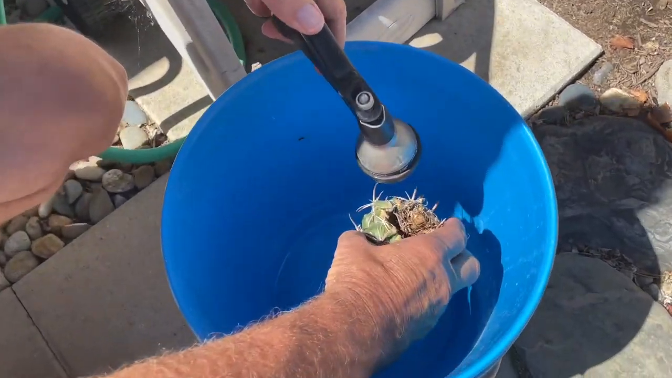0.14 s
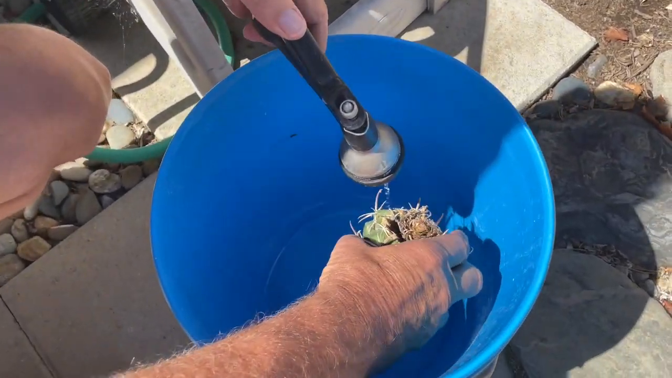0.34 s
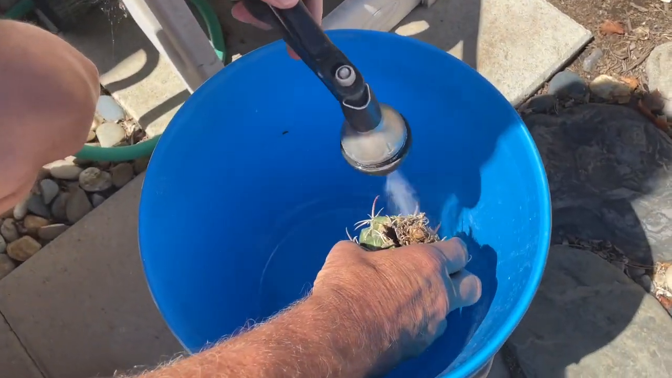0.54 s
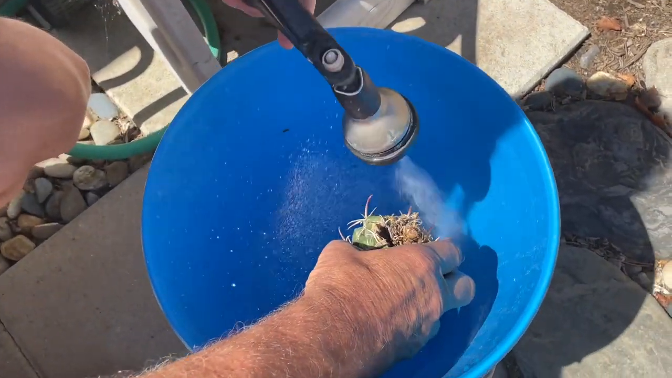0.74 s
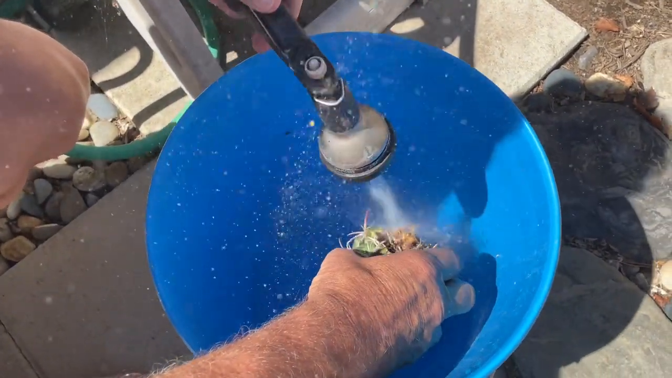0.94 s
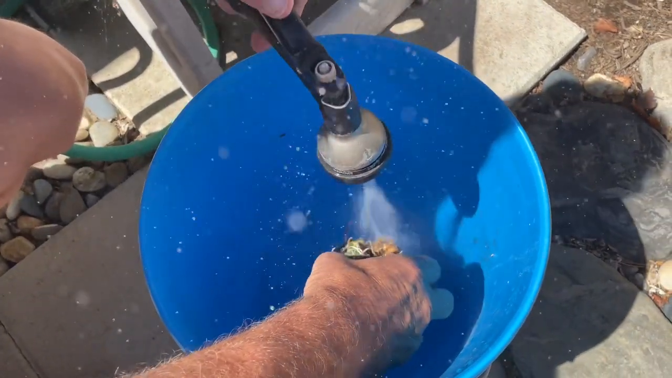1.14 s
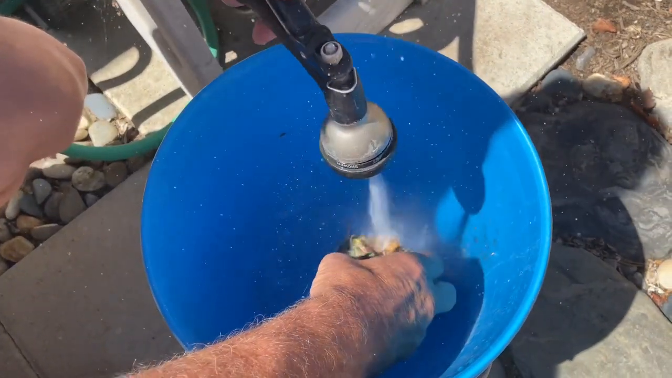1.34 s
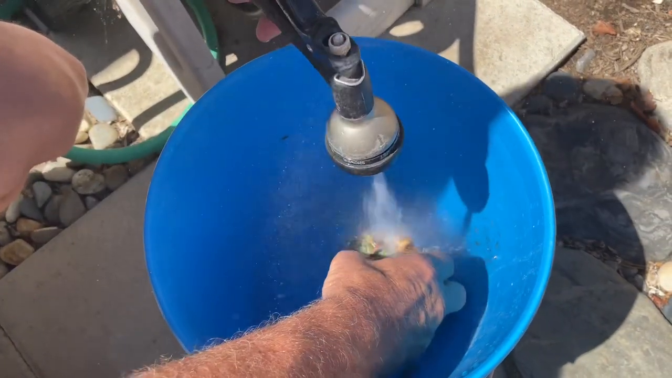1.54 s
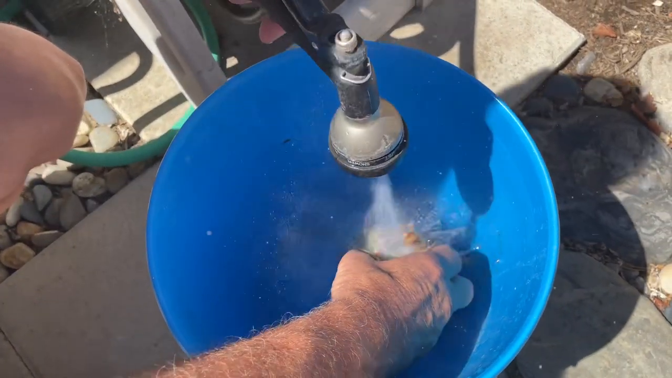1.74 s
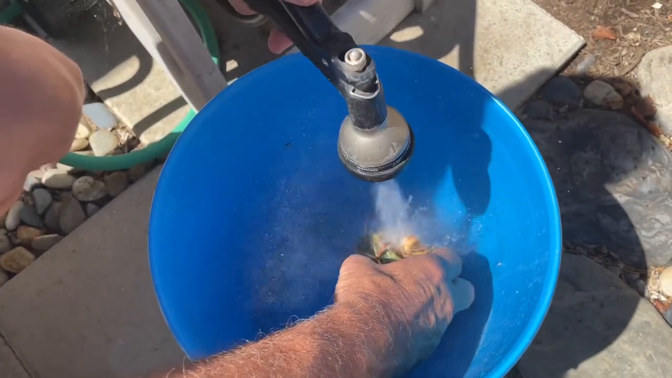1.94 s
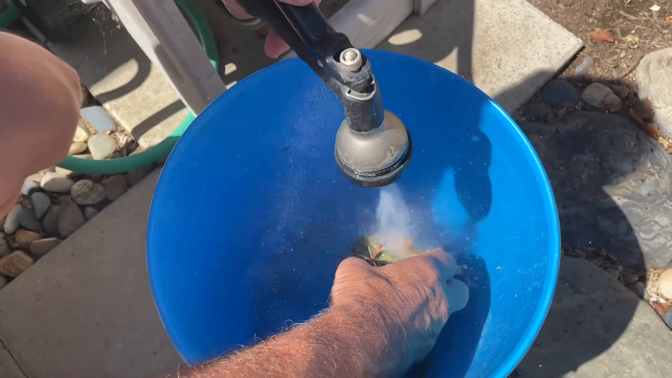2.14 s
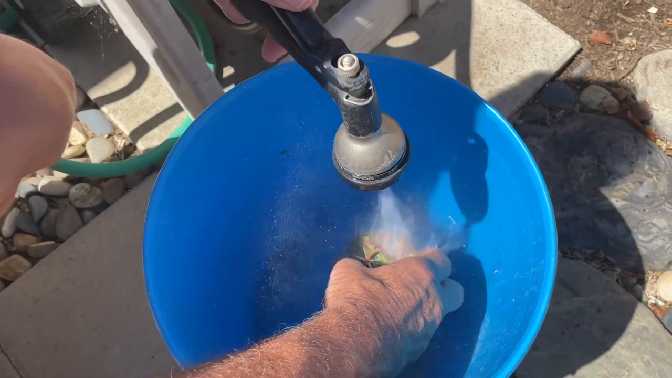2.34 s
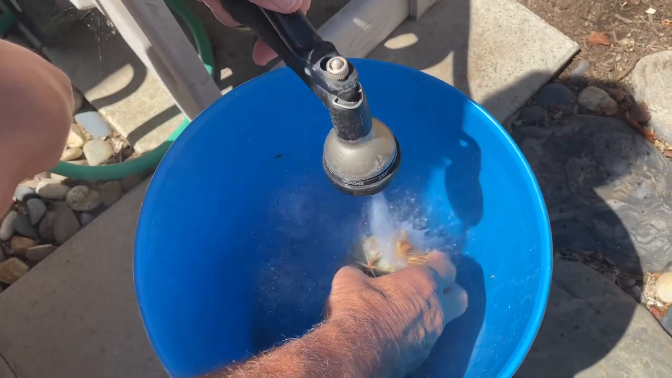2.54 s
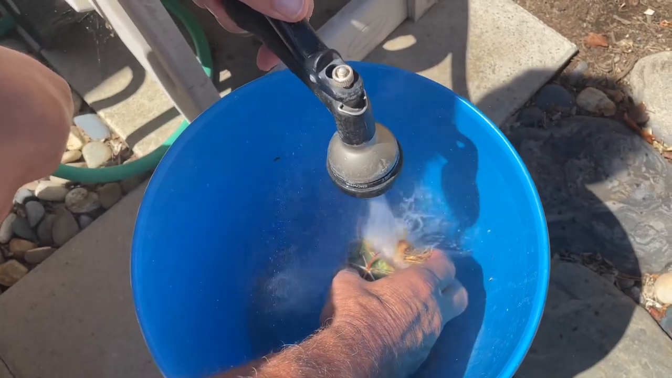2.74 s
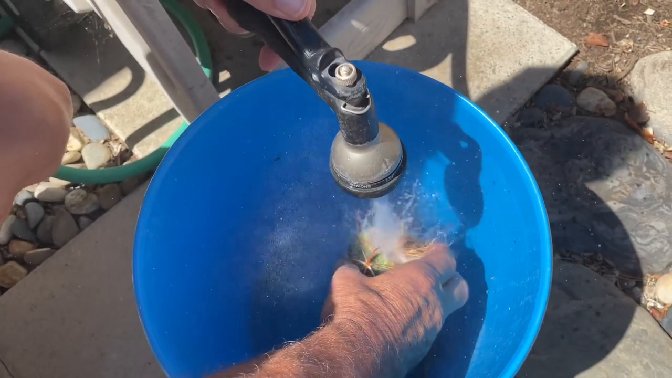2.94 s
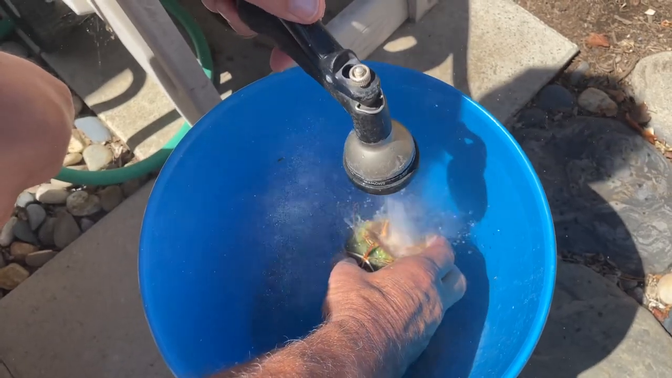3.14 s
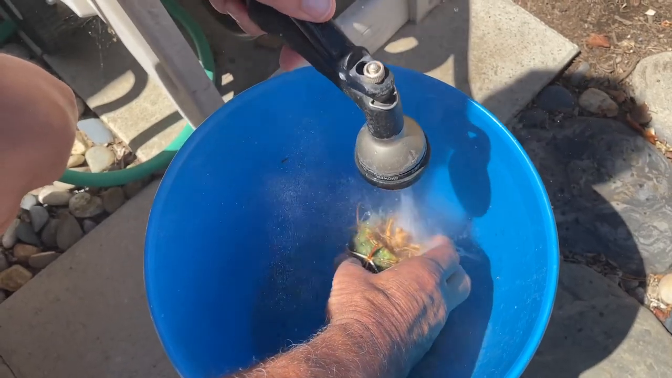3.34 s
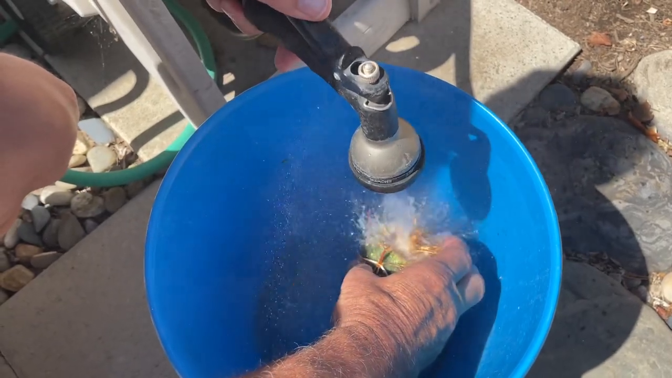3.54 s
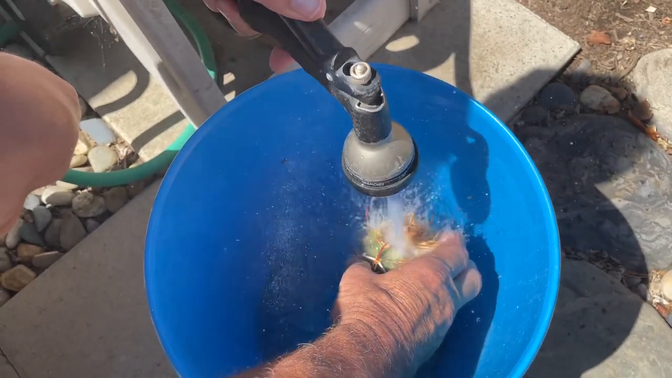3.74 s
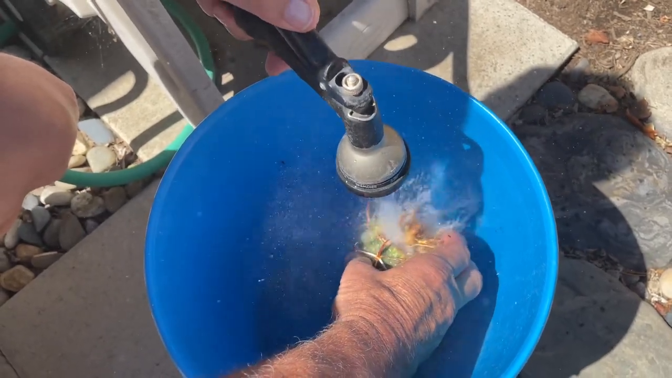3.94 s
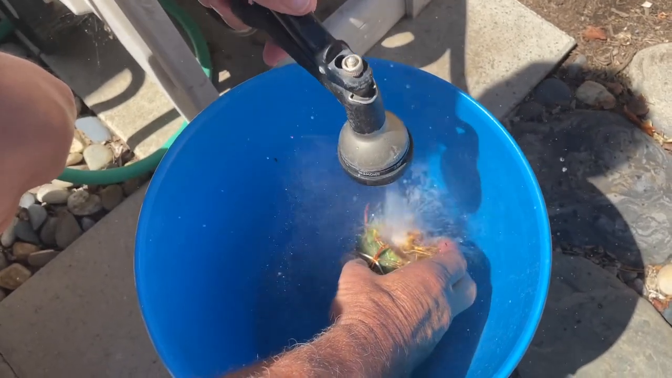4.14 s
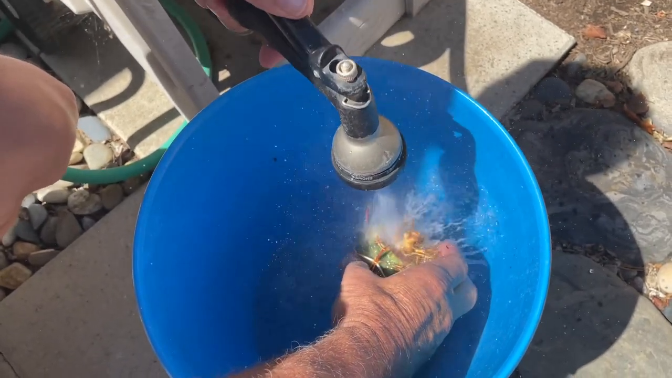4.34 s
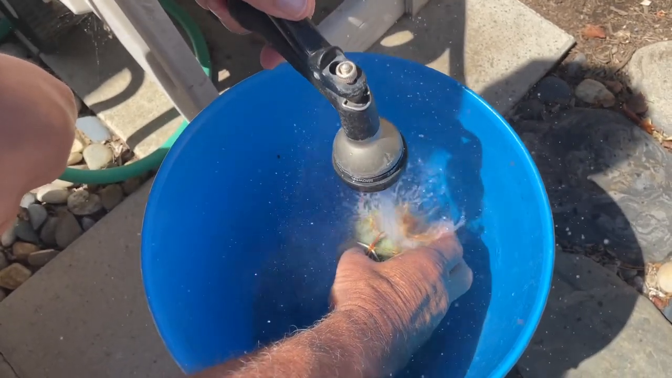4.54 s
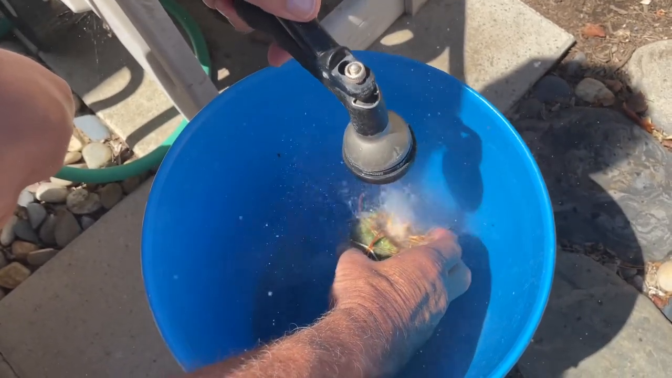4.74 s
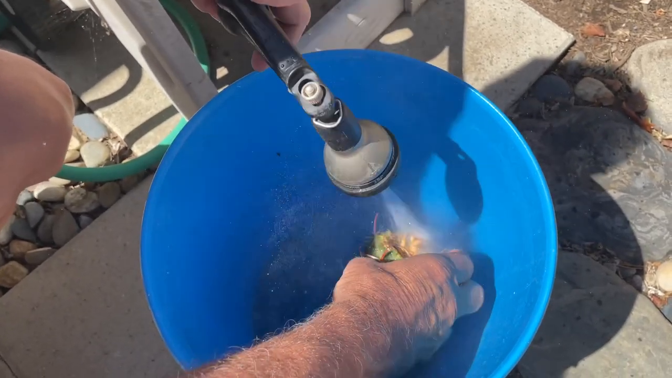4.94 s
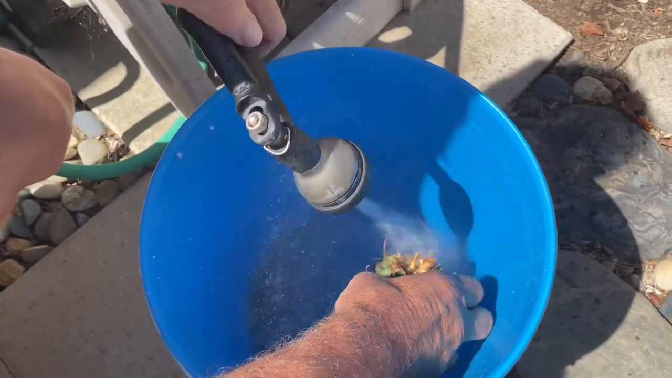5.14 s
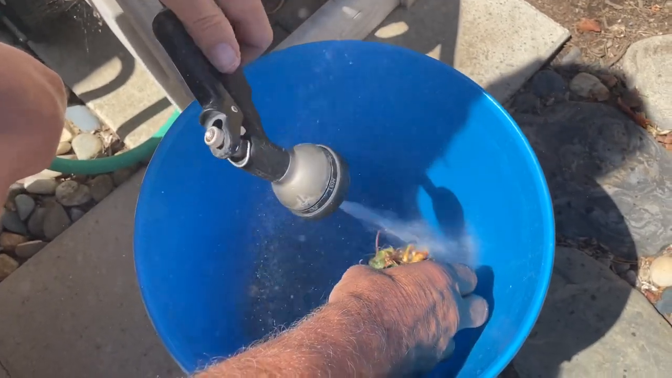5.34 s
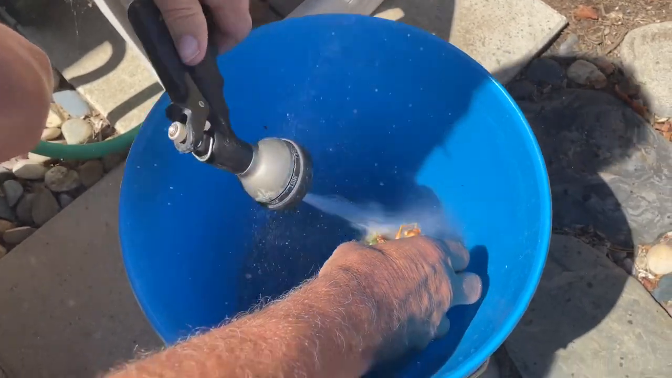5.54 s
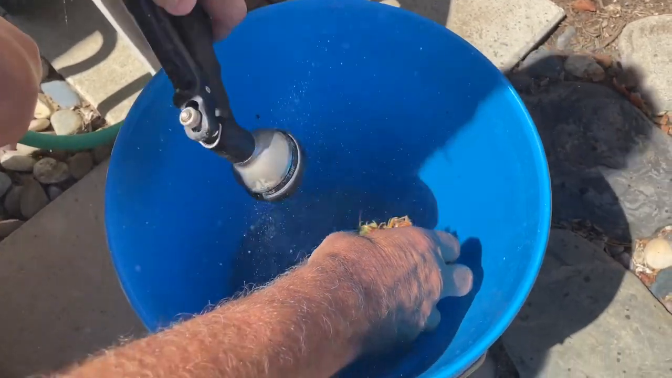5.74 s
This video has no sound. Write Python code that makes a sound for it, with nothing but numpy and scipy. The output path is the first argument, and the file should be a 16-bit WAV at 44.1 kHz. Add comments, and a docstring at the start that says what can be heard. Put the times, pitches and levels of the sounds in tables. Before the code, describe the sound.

Outdoors, water sprays hard into a plastic bucket, slaps its wall, patters on roots, rattles along the plastic, then stops with a squeaky drip.

```python
"""Over a faint outdoor rumble, a faint hiss swells with a thin whistle as a valve opens, then its lever clicks.
A jet of water spits, drums on a plastic bucket or slants along its wall, and patters on plant roots.
When the valve shuts, water trickles off the roots and the draining head squeaks.
Water is random tiny impacts, coloured by smooth spectra or passed through resonances of the plastic,
the hollows and the air; whistle and squeaks are gliding sines, the click and thuds fading ones."""
import sys
import numpy as np
from scipy import signal
from scipy.fft import rfft, irfft, next_fast_len
from scipy.io import wavfile
from scipy.ndimage import uniform_filter1d, map_coordinates

SR = 44100
rng = np.random.default_rng(int(sys.argv[2]) if len(sys.argv) > 2 else 0)


def put_to_file(sound):
    """Save the sound as 16-bit audio at rate SR, in the file named by the first command-line argument."""
    columns = np.atleast_2d(sound).T  # one column per channel
    safe = np.clip(columns, -1, 1)
    whole_steps = np.round(safe * 32767)
    wavfile.write(sys.argv[1], SR, whole_steps.astype(np.int16))


N = 259749

# Levels below are relative: some are raised or lowered again where they are used.
# outdoor rumble: (time [s], level [dB])
RUMBLE_LEVEL = [(.45, -46.5), (.75, -55), (1.6, -58.5)]
# faint hiss swelling up to the click: (time [s], level [dB])
EARLY_HISS_LEVEL = [(0.2, -82), (0.27, -61), (0.31, -52.5), (0.39, -42.5), (0.415, -34), (0.45, -58),
                    (0.5, -120)]
# thin whistle of the half-open valve: (time [s], pitch [Hz], level [dB])
VALVE_WHISTLE = [(0.345, 4600, -58), (0.372, 4530, -38), (0.392, 4540, -36), (0.402, 4350, -41),
                 (0.418, 4400, -39), (0.435, 4380, -70)]
# jolts of bucket and handle as the jet starts or jumps:
# (time [s], thud level [dB], spit level [dB], spit rise [s], spit fall by 60 dB [s])
JOLTS = [(0.399, -13, -49.5, .002, .05), (0.404, -39, -21.5, 0.0063, 0.082),
         (0.442, -12.5, -43, .002, .057), (0.453, -28, -20, 0.0018, 0.1), (0.486, -11, -21, .001, 0.13),
         (1.268, -28, -12.5, 0.0059, 0.13)]
# jet sweeping squarely over the bucket wall:
# (start [s], loudest [s], end [s], drumming level [dB], boom level [dB])
SQUARE_HITS = [(0.44, 0.473, 0.6, -35, -55), (0.487, 0.489, .625, -17, -45), (1.02, 1.205, 1.286, -22, -27),
               (5.563, 5.58, 5.61, -41, -36.5)]
# hiss, growing as more of the jet strikes the plant and hand: (time [s], level [dB])
HISS_LEVEL = [(0.66, -36), (0.72, -42.5), (0.8, -41), (0.88, -34.5), (1.22, -33), (1.4, -39), (1.63, -35.5),
              (2.2, -35.5), (2.85, -33.5), (3.35, -35.5), (3.83, -32), (4.22, -34), (4.64, -32.5),
              (4.76, -36.5), (4.87, -38), (4.98, -38.5), (5.08, -39), (5.72, -35.5)]
# slugs of water slapping the bucket wall: (time [s], level [dB])
SLAP_TIMES = [(0.4845, -11), (0.489, -5.5), (0.498, -13.5), (0.506, -14), (0.517, -16), (0.555, -13),
              (0.778, -29), (0.954, -15), (1.005, -19), (1.026, -29.5), (1.05, -16), (1.104, -10),
              (1.259, -9)]
# jet slanting along the wet wall:
# (start [s], loudest [s], end [s], ring level [dB], splash level [dB], note pitch [Hz], note level [dB])
SLANTING_SWEEPS = [(0.61, 0.81, 1.004, -31, -38.5, 1695, -32.5), (0.962, 1.12, 1.34, -31, -30, 1660, -39),
                   (4.88, 4.908, 5.26, -35.5, -34, 1725, -37.5),
                   (5.097, 5.195, 5.28, -31.5, -36, 1663, -28.5),
                   (5.315, 5.402, 5.48, -26, -26.5, 1650, -26),
                   (5.49, 5.535, 5.63, -28.5, -30.5, 1704, -27.5),
                   (5.71, 5.728, 5.75, -30, -35, 1660, -37.5)]
# squeaks of the draining head:
# (time [s], starting pitch [Hz], final pitch [Hz], level [dB], length [s])
HEAD_SQUEAKS = [(5.773, 4400, 4700, -42, 0.02), (5.778, 4680, 4200, -35, 0.052),
                (5.801, 3010, 2700, -39.5, 0.038), (5.797, 2150, 2250, -47, 0.02),
                (5.829, 1430, 1100, -45, 0.025), (5.841, 2950, 2550, -46.5, 0.029),
                (5.843, 4520, 4540, -45, 0.028), (5.852, 1200, 1400, -48.5, 0.017),
                (5.876, 2850, 2950, -50, 0.016)]

# resonances of the flexing bucket base: (pitch [Hz], width [Hz], level [dB])
BASE_MODES = [(83, 9.9, -12), (209, 38, -6.5), (406, 120, -26)]
# resonances of the bucket wall: (pitch [Hz], width [Hz], level [dB])
WALL_MODES = [(84, 5.6, -18), (451.6, 13, -3), (579.5, 28, -0.5), (814, 33.5, 9), (973, 41, 3.5),
              (1062, 41, 6), (1252, 66, 2.5), (1440, 29, -9), (1585, 65, -3.5), (1856, 42, 0),
              (2277, 50, -4.5), (2787, 84, -1), (3230, 32, -19)]
# ring of the wall under a slanting jet: (pitch [Hz], width [Hz], level [dB])
WET_WALL_MODES = [(594, 70, -9.5), (810, 22, -3), (1060, 70, -0.5), (1253, 40, 1.5), (1418, 72, 1.5),
                  (1840, 56, -2.5), (2220, 90, -2), (2396, 120, -3.5), (2574, 84, -3.5), (2870, 190, -5)]
# air cavity and base of the bucket: (pitch [Hz], width [Hz], level [dB])
CAVITY_MODES = [(158, 36, -10), (209, 24, 0)]
# hollows of hand and bucket around the roots: (pitch [Hz], width [Hz], level [dB])
HOLLOW_MODES = [(607, 31, -5.5), (797, 12.6, 7), (1038, 52, -2), (1296, 67, 4), (1750, 67, -4.5),
                (2134, 60, 3.5), (2566, 64, 7), (2813, 130, 6), (3193, 86, 3.5), (3450, 92, 6),
                (3743, 51, 5), (4205, 91, 8.5), (4480, 140, 4.5), (5590, 470, 7), (7220, 120, -3)]

# spectrum of the outdoor rumble: (frequency [Hz], density [dB per Hz])
OUTDOOR_COLOUR = [(25, -14), (50, 3), (78, 6), (115, 0.5), (200, -11), (500, -17.5), (1200, -26),
                  (2500, -31.5), (6000, -39), (15000, -66)]
# spectrum of the finest droplets: (frequency [Hz], density [dB per Hz])
MIST_COLOUR = [(300, -40), (1500, -6.5), (3000, -2.5), (5500, 0), (8000, -3.5), (10800, 1), (13500, -5.5),
               (14500, -3.5), (15800, -13)]
# spectrum of a spit of water: (frequency [Hz], density [dB per Hz])
SPIT_COLOUR = [(300, -10), (1100, -2), (2000, -15), (5000, 3), (8000, 1.5), (13500, -2), (15000, -11)]
# spectrum of splashing on the wall: (frequency [Hz], density [dB per Hz])
WALL_COLOUR = [(300, -25), (640, -16), (850, -31), (1200, 6), (1650, 1.5), (1980, 0), (2400, 0),
               (5000, -1.5), (7000, -12), (15000, -39)]
# spectrum of splashing from a slanting jet: (frequency [Hz], density [dB per Hz])
GRAZE_COLOUR = [(200, -12), (600, 1), (1300, 1), (1980, 4), (2650, -0.5), (4300, 3), (7500, -13.5),
                (15000, -58)]
# spectrum of splashing on the roots: (frequency [Hz], density [dB per Hz])
ROOT_COLOUR = [(90, -28), (150, -1.5), (450, -7), (1200, -3.5), (3000, -3), (5500, -4), (8000, -5.5),
               (13000, -13), (15000, -30)]

# how alike left and right are: (frequency [Hz], likeness [0-1])
LEFT_RIGHT_LIKENESS = [(100, 0.96), (300, 0.97), (800, 0.47), (1300, 0.74), (2200, 0.33), (5000, 0.15),
                       (7500, 0.44), (9500, 0.84), (11500, 0.96), (13300, 1), (14500, 1)]
# how far left runs ahead of right: (frequency [Hz], phase [rad])
LEFT_LEAD = [(60, 0), (200, .22), (700, .65), (1500, .35), (2700, 1.3), (3800, 1.5), (5000, 2.6),
             (6500, -.5), (8400, -3.1), (10600, -6), (12700, -6.5), (14200, -9.4)]

# main flow: opening and closing times, then how gradually it builds and dies [s]
OPEN_S, SHUT_S, BUILD_S, DIE_S = 0.4754, 5.744, 0.018, 0.016
CLICK_S, CLICK_RISE_S = 0.414, 0.005
SURGE_DB, SURGE_S = 9, 0.22  # pressure stored in the hose makes the first moments louder
WALL_EDGE_DB = 7.5  # how much weaker a square hit is at its ends
RUNOFF_DB, RUNOFF_DB_PER_S = -10.5, 31.5  # water running down the wall afterwards
BOOM_EDGE_DB, BOOM_DB_PER_S = 9, 135  # the same weakening, and the fall, for the boom
FALLING_WATER_DB = -47.5  # steady feed of the boom
GRAZE_EDGE_DB, GRAZE_DB_PER_S = 7, 265
NOTE_WIDTH_HZ = 75
ROOTS_FROM_S, ROOTS_TO_S, ROOTS_SLIDE_S = 1.43, 4.8, 0.12  # jet held on the roots; slide on and off
PATTER_GROWS, RING_GROWS = 0.1, 1.85  # dB gained per dB of hiss
TRICKLE_DB, TRICKLE_DB_PER_S = -43, 38
TOP_HZ = 15850  # nothing is kept from here up


def amp(db):
    """Turn decibels into a gain."""
    return 10 ** (np.asarray(db) / 20)


def unit(x):
    """Scale a sound to an rms level of 1."""
    return x / np.sqrt(np.mean(x ** 2) + 1e-20)


def along(points, hz):
    """Read a value between (frequency, value) points on a log frequency axis."""
    f, v = np.transpose(points)
    return np.interp(np.log(hz + 1), np.log(f + 1), v)


def seconds():
    """The time of every sample."""
    return np.arange(N) / SR


def curve(rows):
    """One value per sample from (time, value) rows."""
    return np.interp(seconds(), *np.transpose(rows))


def wobble(rate):
    """A smooth random curve with the given number of random points a second."""
    return map_coordinates(rng.standard_normal(4096), [np.arange(N) * rate / SR], mode="mirror")


def filtered(x, response):
    """Multiply the spectrum of x by a response that depends on frequency."""
    size = next_fast_len(N + SR // 2)
    return irfft(rfft(x, size) * response(np.fft.rfftfreq(size, 1 / SR)), size)[..., :N]


def coloured(x, spectrum):
    """Give x a smooth spectrum, at rms 1."""
    return unit(filtered(x, lambda hz: amp(along(spectrum, hz))))


def rung(x, modes):
    """Pass x through resonances, at rms 1; neighbouring ones swing in opposite senses."""
    def response(f):
        total = 0
        for k, (centre, width, db) in enumerate(modes):
            resonance = 1j * f * width / (centre * centre - f * f + 1j * f * width)
            total = total + (-1) ** k * amp(db) * resonance
        return total
    return unit(filtered(x, response))


def droplets(rate, spread_db, clump_db):
    """Two streams of tiny impacts of random size; the jet breaks up in clumps that both share."""
    lands = rng.random((2, N)) < rate / SR  # rate is impacts a second
    spread = amp(spread_db * np.clip(rng.standard_normal((2, N)), -2, 2))
    size = spread * rng.standard_normal((2, N))
    clumps = amp(clump_db * (wobble(170) + wobble(40)))
    return unit(lands * size * clumps)


def patchy(x, depth_db, size=(4, 24)):
    """Let the colour drift, about 170 Hz by 140 ms at a time, as the jet wanders."""
    z = signal.stft(x, nperseg=1024, noverlap=768)[2]
    field = rng.standard_normal(z.shape[1:])
    field = uniform_filter1d(field, size[0], 0)
    field = uniform_filter1d(field, size[1], 1)
    drifting = z * amp(depth_db * unit(field))
    return unit(signal.istft(drifting, nperseg=1024, noverlap=768)[1][:, :N])


def gate(start, end, attack, release):
    """1 from start to end, rising smoothly before and dying away after."""
    t = seconds()
    before = np.maximum(start - t, 0) / attack
    after = np.maximum(t - end, 0) / release
    return np.exp(-before ** 2 - after ** 2)


def sweep(start, loudest, end, edge_db, fall_db_per_s, tail_db=0, arch=1.27, attack=0.038):
    """Gain as the jet crosses a surface: an arch, strongest in between, then a dying tail."""
    t = seconds()
    off_centre = np.interp(t, [start, loudest, end], [1, 0, 1])
    tail = (t > end) * (tail_db - fall_db_per_s * (t - end))
    return gate(start, np.inf, attack, 1) * amp(tail - edge_db * off_centre ** arch)


def flow():
    """Gain of the main jet: on while the valve is open."""
    return gate(OPEN_S, SHUT_S, BUILD_S, DIE_S)


def outdoors():
    """Noise with a falling spectrum makes the faint low rumble of the surroundings."""
    return amp(curve(RUMBLE_LEVEL)) * coloured(rng.standard_normal((2, N)), OUTDOOR_COLOUR)


def valve(ring_hz=1240, ring_db=-27, ring_t60=0.071):
    """A faint hiss swells, with a wavering whistle, as the valve opens; the lever clicks home and rings."""
    early_hiss = coloured(droplets(rate=17000, spread_db=6, clump_db=0.5), MIST_COLOUR)
    out = amp(curve(EARLY_HISS_LEVEL)) * early_hiss
    s, hz, db = np.transpose(VALVE_WHISTLE)
    pitch = np.interp(seconds(), s, hz) * (1 + .015 * wobble(400))
    whistle_db = np.interp(seconds(), s, db, -120, -120) + 2 * wobble(200)
    # row 0 is the stream that left and right share
    out[0] += amp(whistle_db) * np.sqrt(2) * np.sin(2 * np.pi * np.cumsum(pitch) / SR)
    t = np.maximum(seconds() - CLICK_S, 0)
    click_gain = amp(ring_db - 60 * t / ring_t60) * (1 - np.exp(-t / CLICK_RISE_S))
    out[0] += click_gain * np.sin(2 * np.pi * ring_hz * t)
    return out


def spurts(attack=0.0054):
    """Each slug of water thuds on the bucket's base and spits; narrow resonances ring longest."""
    out = np.zeros((2, N))
    spit = coloured(droplets(rate=11000, spread_db=2.0, clump_db=-1.2), SPIT_COLOUR)
    for s, thud_db, spit_db, rise, t60 in JOLTS:
        t = np.maximum(seconds() - s, 0)
        out += (1 - np.exp(-t / rise)) * amp(spit_db - 60 * t / t60) * spit
        thud = np.zeros(N)
        for hz, width, db in BASE_MODES:
            thud += amp(db) * np.exp(-np.pi * width * t) * np.sin(2 * np.pi * hz * t)
        out[0] += (1 - np.exp(-t / attack)) * amp(thud_db) * thud
    return out


def wall():
    """Square hits drum on the thin plastic and make its resonances ring."""
    drops = droplets(rate=11000, spread_db=3.5, clump_db=1.5)
    force = np.zeros(N)
    for *when, drum_db, _ in SQUARE_HITS:
        force += amp(drum_db) * sweep(*when, WALL_EDGE_DB, RUNOFF_DB_PER_S, RUNOFF_DB,
                                      arch=1.0, attack=0.0072)
    ring = rung(drops, WALL_MODES)
    splash = coloured(patchy(drops, depth_db=5.0), WALL_COLOUR)
    return force * (amp(2.5) * ring + amp(-2.0) * splash)


def boom(graze_db=-24, base_db=-15.0, low_db=-6, flutter_db=1.1, linger_db_per_s=45):
    """Heavy drops sound the air in the bucket; square hits stir its deepest mode and the base, which linger."""
    def hits(fall):
        return sum(amp(db) * sweep(*when, BOOM_EDGE_DB, fall) for *when, _, db in SQUARE_HITS)

    grazes = np.zeros(N)
    for *when, ring_db, _, _, _ in SLANTING_SWEEPS:
        grazes += amp(ring_db + graze_db) * sweep(*when, GRAZE_EDGE_DB, GRAZE_DB_PER_S)
    drops = droplets(rate=1800, spread_db=2.5, clump_db=0.0)
    fluttering = unit(amp(flutter_db * wobble(28)) * rung(drops, CAVITY_MODES))
    feed = amp(FALLING_WATER_DB) + amp(-2.5) * hits(BOOM_DB_PER_S) + grazes
    air = flow() * feed * fluttering
    heavy = droplets(rate=1800, spread_db=-5.5, clump_db=0.0)
    deep_air = amp(low_db) * rung(heavy, CAVITY_MODES[:1])
    base = amp(base_db) * rung(heavy, BASE_MODES[:1])
    return amp(2.0) * air + hits(linger_db_per_s) * (deep_air + base)


def mist():
    """The finest droplets hiss while the valve is open, with extra push just after it opens."""
    drops = droplets(rate=26000, spread_db=-2.0, clump_db=0.37)
    hiss = coloured(patchy(drops, depth_db=2.4), MIST_COLOUR)
    surge_db = SURGE_DB * np.clip(1 - (seconds() - OPEN_S) / SURGE_S, 0, 1)
    return flow() * amp(6.0 + curve(HISS_LEVEL) + surge_db) * hiss


def slaps(attack=0.00054, damping_hz=25, crack_db=-7, crack_t60=0.018):
    """Slugs of water slap the wall: a wet crack and a ring of its resonances, damped by the water."""
    out = np.zeros((2, N))
    t = np.arange(SR // 8) / SR
    for s, db in SLAP_TIMES:
        ring = np.zeros(len(t))
        for hz, width, level in WALL_MODES:
            fade = np.exp(-np.pi * (width + damping_hz) * t)
            tone = np.sin(2 * np.pi * (hz * t + rng.random()))
            ring += amp(level + rng.normal(0, 1.4)) * fade * tone
        blow = amp(crack_db - 60 * t / crack_t60) * rng.standard_normal((2, len(t)))
        blow[0] += (1 - np.exp(-t / attack)) * ring / np.abs(ring).max()
        out[:, round(s * SR):][:, :len(t)] += amp(db) * blow
    return out


def graze():
    """A slanting jet rattles on the wet wall and sounds a narrow note, pitched by where it lands."""
    def drops():
        return droplets(rate=7000, spread_db=0.5, clump_db=0.67)

    ring = rung(drops(), WET_WALL_MODES)
    splash = coloured(drops(), GRAZE_COLOUR)
    feed, out = drops(), np.zeros((2, N))
    for *when, ring_db, splash_db, note_hz, note_db in SLANTING_SWEEPS:
        note = rung(feed, [(note_hz, NOTE_WIDTH_HZ, 0)])
        mix = amp(ring_db) * ring + amp(splash_db) * splash + amp(note_db) * note
        out += sweep(*when, GRAZE_EDGE_DB, GRAZE_DB_PER_S) * mix
    return flow() * out


def roots():
    """The jet patters on the roots; the more squarely it strikes, the more the hollows around them ring."""
    drops = droplets(rate=9000, spread_db=2.5, clump_db=0.42)
    aim_db = curve(HISS_LEVEL) - curve(HISS_LEVEL).mean()
    splash = coloured(patchy(drops, depth_db=2.2), ROOT_COLOUR)
    ring = rung(patchy(drops, depth_db=1.5), HOLLOW_MODES)
    held = gate(ROOTS_FROM_S, ROOTS_TO_S, ROOTS_SLIDE_S, ROOTS_SLIDE_S)
    patter = amp(-37.5 + PATTER_GROWS * aim_db) * splash
    return held * (patter + amp(-34.5 + RING_GROWS * aim_db) * ring)


def trickle_and_squeaks():
    """After the valve shuts, water trickles off the roots and the draining head squeaks in unsteady glides."""
    t = seconds()
    trickle = coloured(droplets(rate=5000, spread_db=2, clump_db=1), ROOT_COLOUR)
    out = (t > SHUT_S) * amp(TRICKLE_DB - TRICKLE_DB_PER_S * np.abs(t - SHUT_S)) * trickle
    for s, from_hz, to_hz, db, length in HEAD_SQUEAKS:
        age = np.clip((t - s) / length, 0, 1)  # 0 at the start of the squeak, 1 at its end
        pitch = (from_hz + (to_hz - from_hz) * age ** 2) * (1 + .004 * wobble(200))
        swell = np.abs(np.sin(np.pi * age)) ** .6 * amp(db + wobble(120))
        out[0] += swell * np.sin(2 * np.pi * np.cumsum(pitch) / SR)
    return out


def left_and_right(pair, pan_db):
    """Mix two unrelated streams into left and right, partly alike, shifted in phase, left louder by pan_db."""
    def blend(hz):
        turn = np.arccos(np.clip(along(LEFT_RIGHT_LIKENESS, hz), 0, .995)) / 2
        return np.array([np.cos(turn), np.sin(turn)])

    mid, side = filtered(pair, blend)
    ears = np.array([[.5], [-.5]])  # each ear takes half of the level and phase difference
    mixed = np.array([mid + side, mid - side])
    return amp(ears * pan_db) * filtered(mixed, lambda hz: np.exp(1j * ears * along(LEFT_LEAD, hz)))


def bucket_echo(x, wet_db, t60):
    """Short waves bounce briefly between the close walls, which ripples the treble."""
    t = np.arange(SR // 8) / SR
    tail = rng.standard_normal((2, len(t))) * amp(-60 * t / t60) * (t > .002)
    echo = signal.fftconvolve(x, tail / np.linalg.norm(tail[0]), axes=1)[:, :N]
    colour = [(400, -40), (1500, -4), (5000, 0), (11000, -8)]  # (frequency [Hz], level [dB])
    return x + amp(wet_db) * filtered(echo, lambda hz: amp(along(colour, hz)))


def scene():
    """Put the spray just left of the middle and the struck wall a little further left, with the echo."""
    water = outdoors() + valve() + spurts() + boom() + mist() + roots() + trickle_and_squeaks()
    spray = left_and_right(water, pan_db=0.66)
    plastic = left_and_right(wall() + slaps() + graze(), pan_db=1.5)
    return bucket_echo(spray + plastic, wet_db=-14, t60=0.07)


def record(dry):
    """Thin the deepest bass, round off the highest peaks and keep nothing from the top limit up."""
    thinned = filtered(dry, lambda hz: hz ** 2 / np.sqrt(hz ** 4 + 52 ** 4))
    rounded = thinned / (1 + (thinned / .85) ** 6) ** (1 / 6)
    return filtered(rounded, lambda hz: hz < TOP_HZ)


dry = scene()
out = record(dry)
put_to_file(out)
```